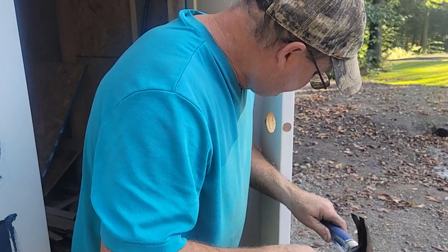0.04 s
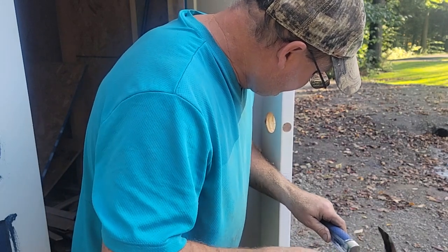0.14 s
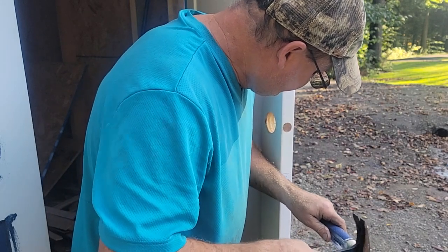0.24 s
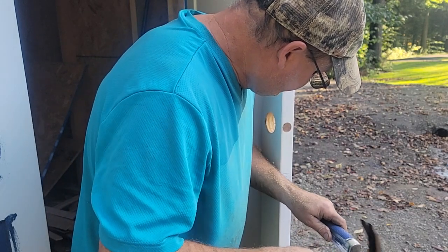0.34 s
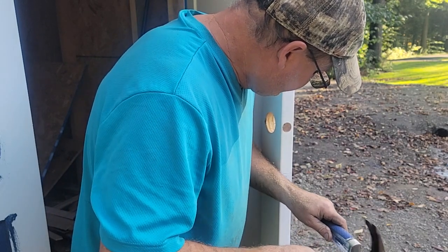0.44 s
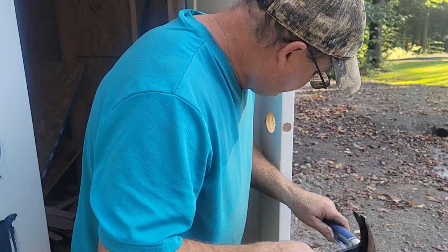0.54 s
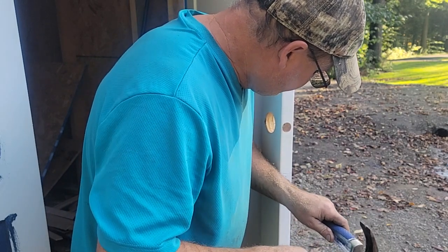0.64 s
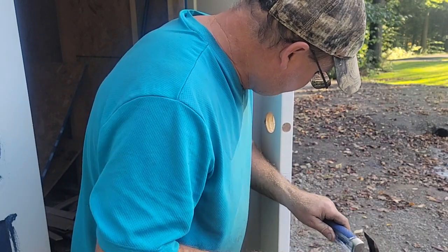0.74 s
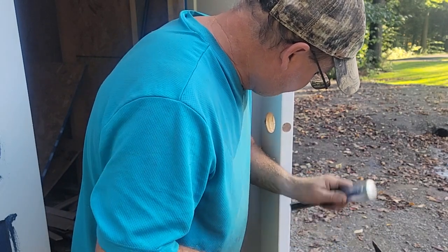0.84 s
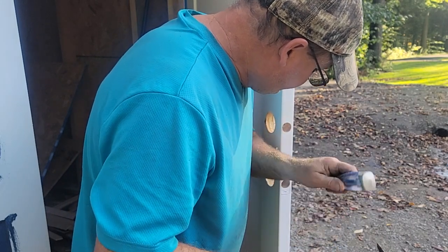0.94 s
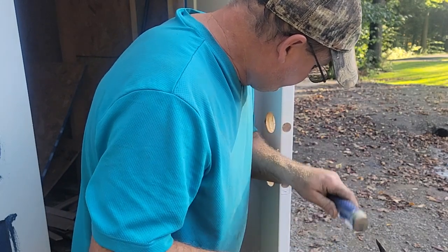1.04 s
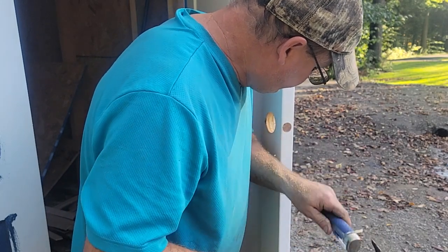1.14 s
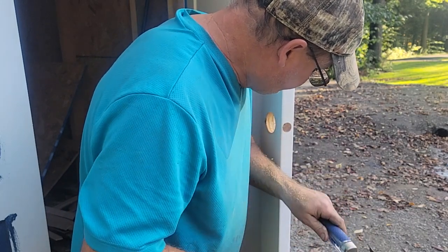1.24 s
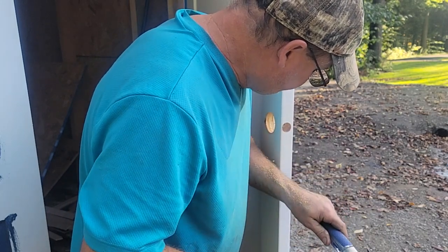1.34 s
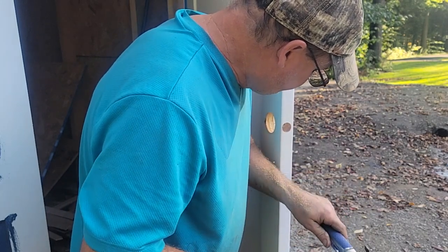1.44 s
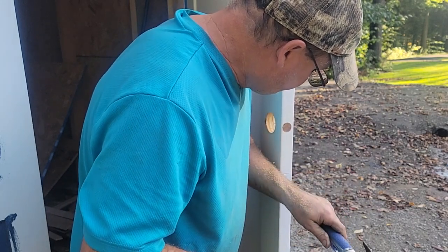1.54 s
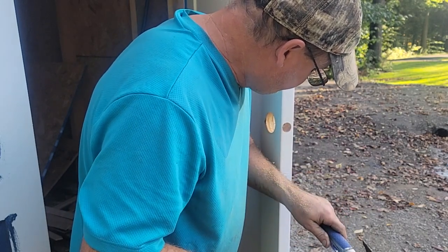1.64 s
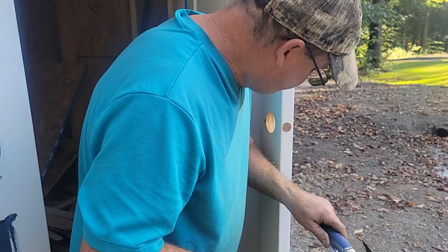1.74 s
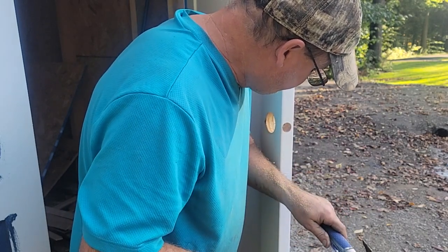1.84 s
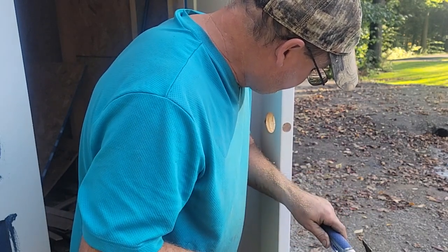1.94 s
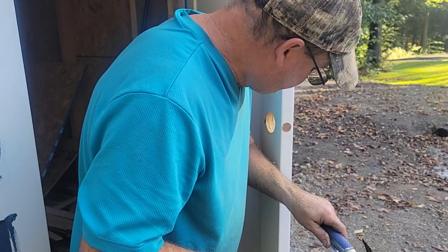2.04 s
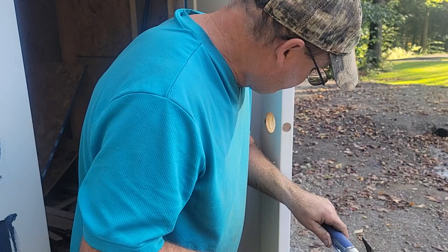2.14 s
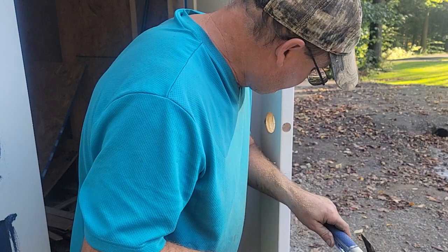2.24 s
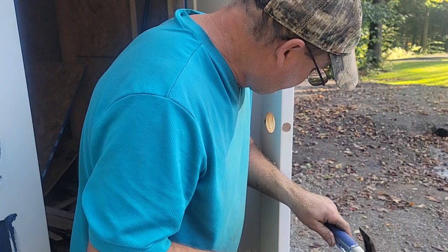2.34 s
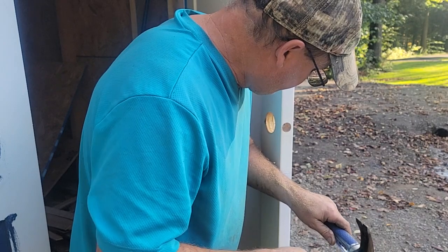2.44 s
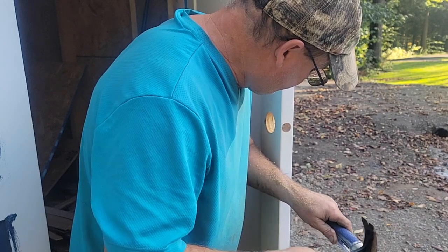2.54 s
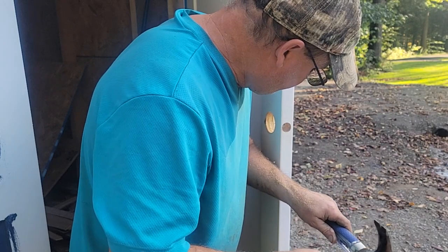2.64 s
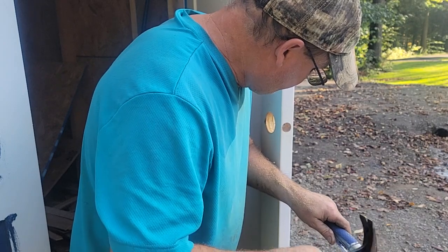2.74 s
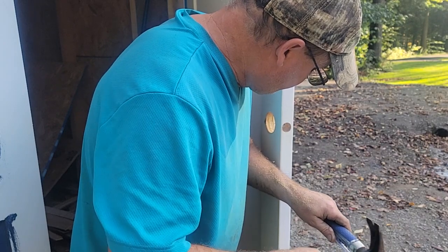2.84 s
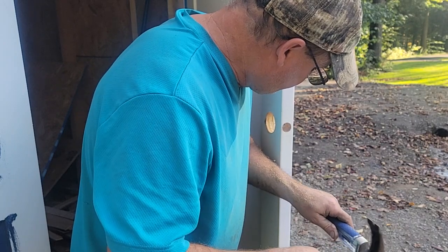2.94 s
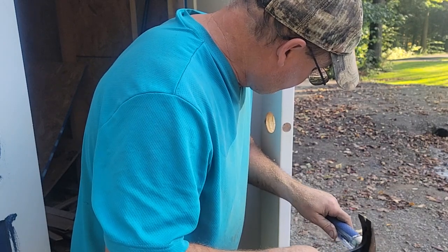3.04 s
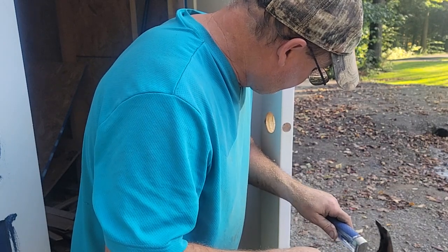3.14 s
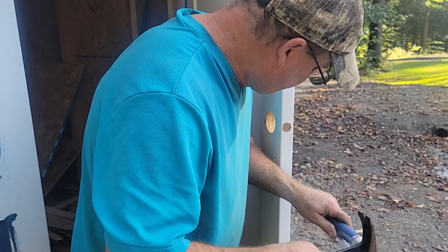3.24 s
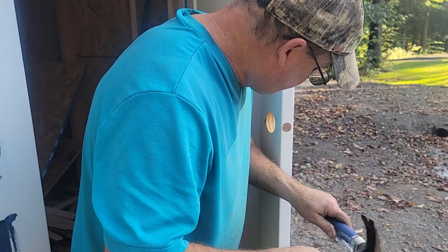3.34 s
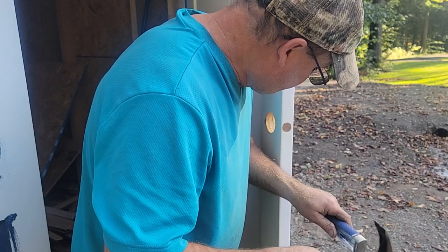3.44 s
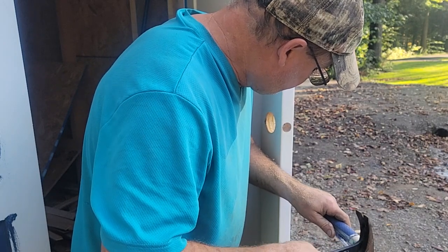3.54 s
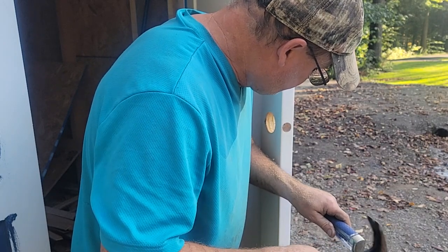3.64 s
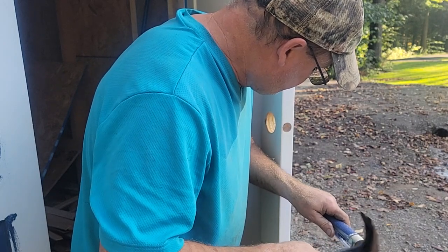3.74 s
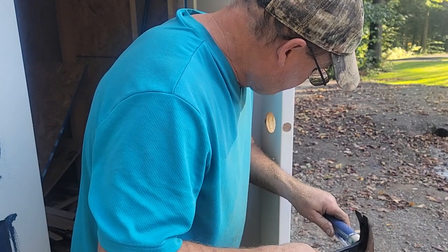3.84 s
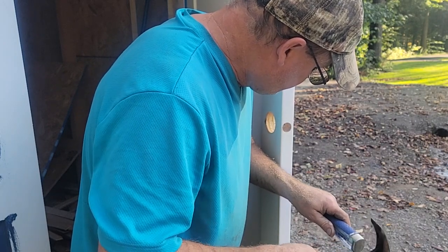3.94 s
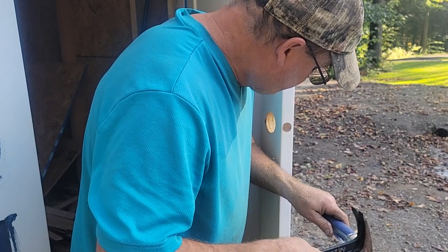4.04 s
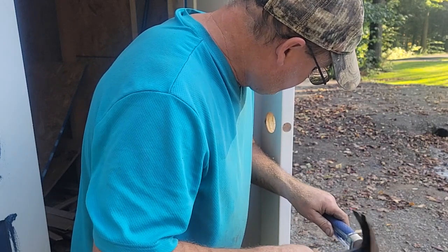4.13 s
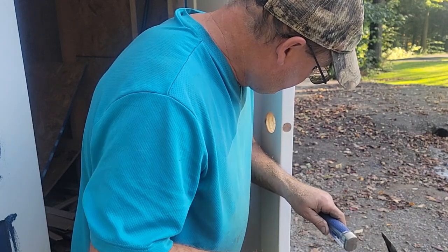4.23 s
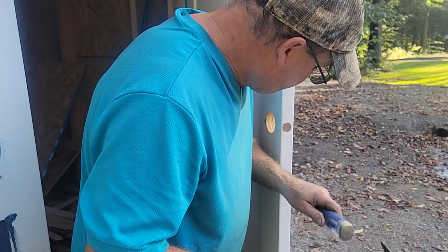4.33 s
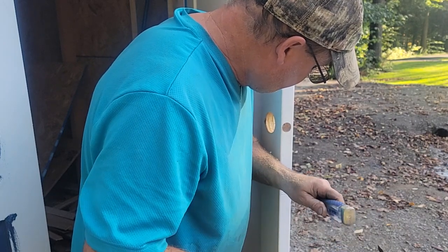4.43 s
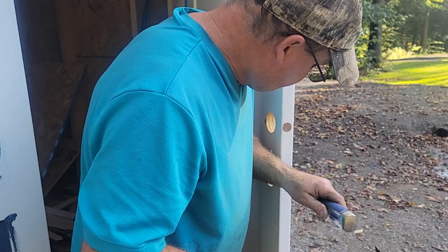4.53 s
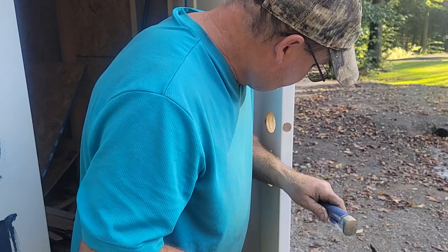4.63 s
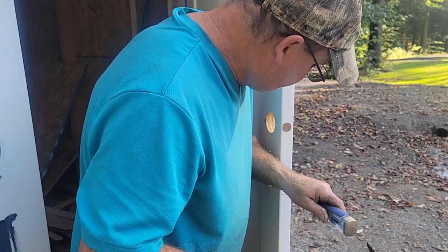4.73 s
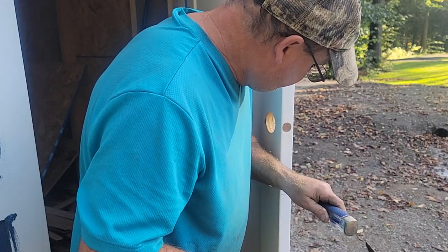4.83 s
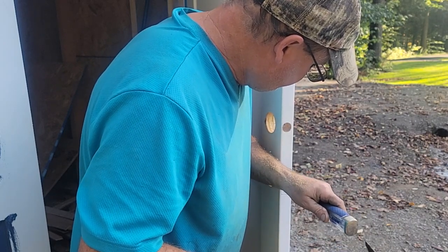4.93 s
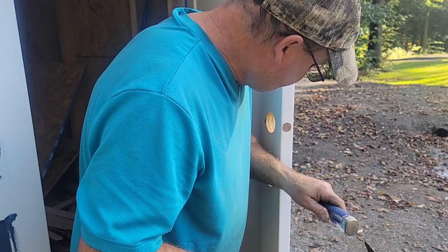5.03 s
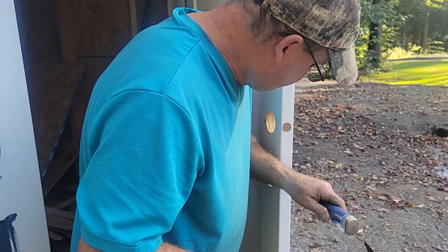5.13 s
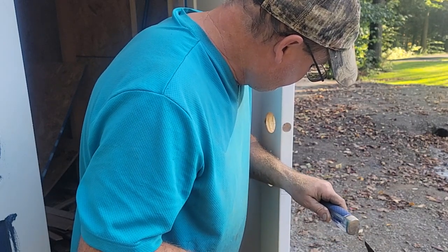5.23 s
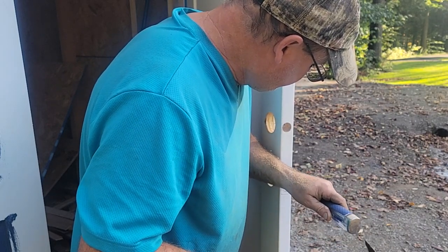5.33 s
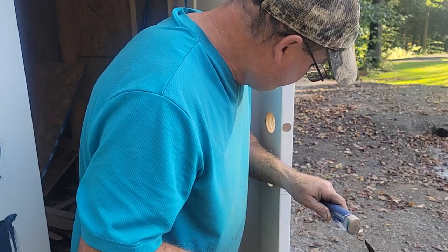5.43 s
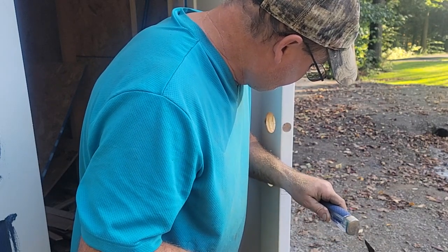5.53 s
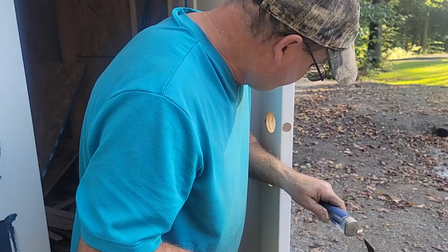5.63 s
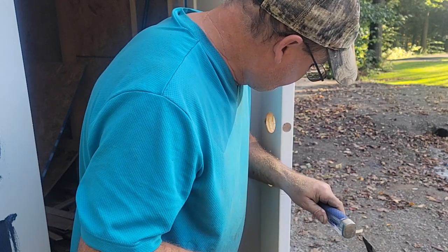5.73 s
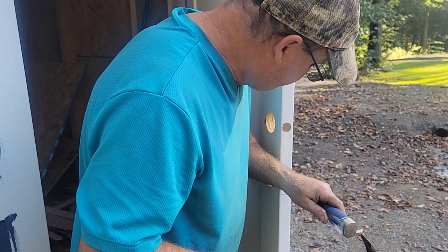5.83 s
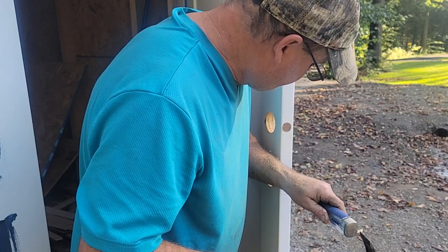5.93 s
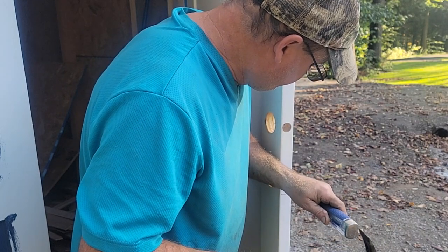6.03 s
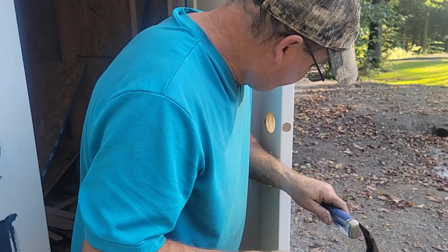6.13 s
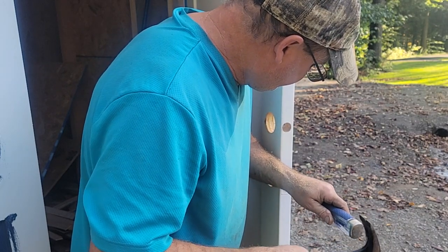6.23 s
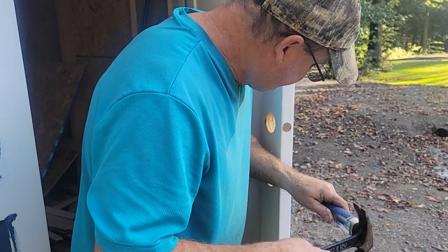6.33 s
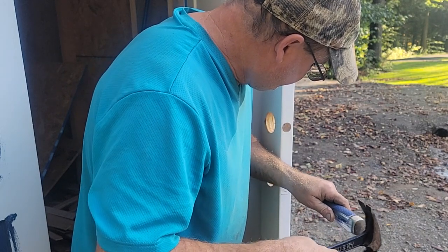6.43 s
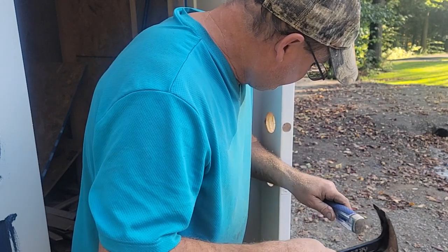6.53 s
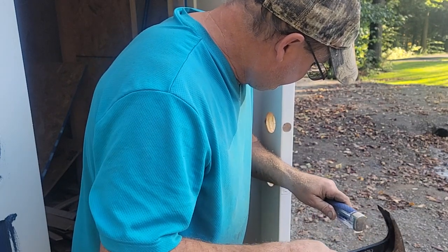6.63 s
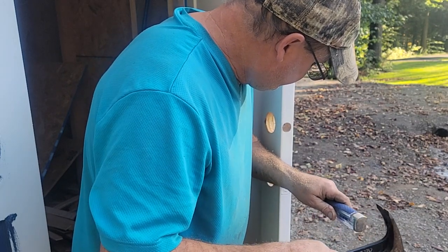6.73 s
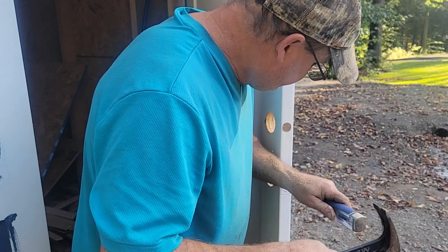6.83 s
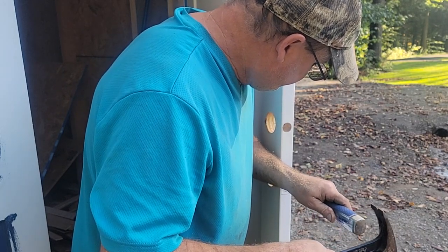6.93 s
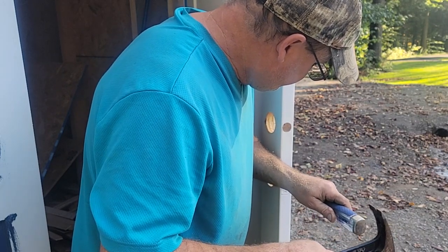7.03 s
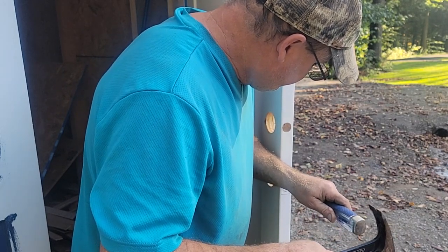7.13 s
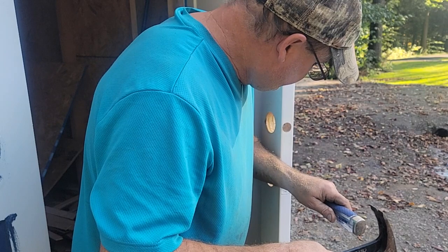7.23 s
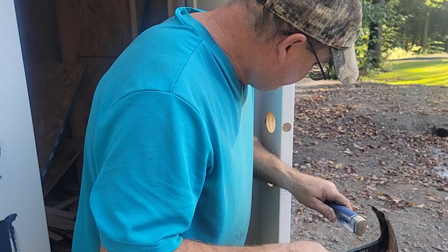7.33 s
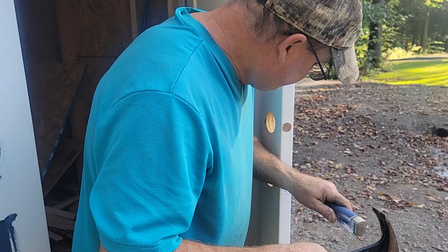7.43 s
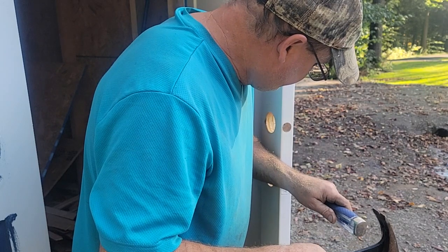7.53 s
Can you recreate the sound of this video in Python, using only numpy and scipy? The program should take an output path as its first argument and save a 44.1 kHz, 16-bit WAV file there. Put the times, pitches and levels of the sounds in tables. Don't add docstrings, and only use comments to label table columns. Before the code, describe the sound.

Outdoors by a wooden shed, steel strikes a chisel set in a door frame: a dying hit and a loud crack, over two seconds of near quiet, seven blows about a quarter second apart growing steelier, another quiet gap with barely audible scrapes, and a final dull tap. Low wall boom and short shed reverberation follow each hit. Distant road drone, airy hiss and faint cricket trill; close stereo microphone.

```python
import sys
import numpy as np
from scipy import signal
from scipy.fft import rfft, irfft, next_fast_len
from scipy.io import wavfile
from scipy.ndimage import uniform_filter1d

SR = 44100
rng = np.random.default_rng(int(sys.argv[2]) if len(sys.argv) > 2 else 0)


def volts_from_db(level):
    exponent = np.asarray(level, float) / 20
    return 10 ** exponent


def pcm_store(signal):
    levels = np.round(np.clip(np.atleast_2d(signal), -1, 1) * 32767)
    wavfile.write(sys.argv[1], SR, levels.astype(np.int16).T)


N = 333837
PADDED = next_fast_len(N + 4096)
LEAD = 256

# pitch_hz, correlation (0 to 1)
LIKENESS = [(60, 0.97), (130, 0.77), (290, 0.41), (640, 0.83), (1400, 0)]


def colour(x, table, column=1):
    size = x.shape[-1]
    hz = np.maximum(np.fft.rfftfreq(size, 1 / SR), 1)
    return irfft(rfft(x) * volts_from_db(lookup(table, hz, column)), size)


def band(x, hz, octaves):
    size = x.shape[-1]
    octaves_off = np.log2(np.maximum(np.fft.rfftfreq(size, 1 / SR), 1) / hz)
    return irfft(rfft(x) * np.cos(np.pi / 2 * np.clip(octaves_off / octaves, -1, 1)), size)


def lookup(table, hz, column=1):
    rows = np.array(table, float)
    return np.interp(np.log(hz), np.log(rows[:, 0]), rows[:, column])


def unit(x):
    return x / np.sqrt(np.mean(x ** 2))


def walk(rate):
    hold = int(SR / rate)
    steps = np.repeat(rng.standard_normal(PADDED // hold + 1), hold)
    return uniform_filter1d(uniform_filter1d(steps, hold), hold)[:PADDED]


def ring(t, hz, t60, gain):
    t = np.maximum(t, 0)[:, None]
    return (np.sin(2 * np.pi * hz * t) * volts_from_db(-60 * t / t60)) @ gain


def add(track, sound, at_s):
    start = int(at_s * SR)
    skip = max(-start, 0)
    stop = min(start + sound.shape[-1], track.shape[-1])
    if stop > 0:
        track[..., start + skip:stop] += sound[..., skip:stop - start]


def pair(like, size):
    mid, side = rng.standard_normal((2, size))
    like = np.clip(like, 0, 1)
    opposed = side * np.array([[1], [-1]])
    return (np.sqrt(1 + like) * mid + np.sqrt(1 - like) * opposed) / np.sqrt(2)


def strike(t, weight_db, wood_db, steel_db):
    # pitch_hz, level_db, t60_s
    tool = [(1120, -15.5, 0.054), (1440, -12, 0.13), (1660, -17.5, 0.028), (2970, -19.5, 0.1),
            (3337, -12, 0.17), (3600, -20.5, 0.046), (4640, -18.5, .14), (5100, -11.5, .1),
            (6250, -16, 0.2), (7000, -10.5, .08), (11100, -11.5, .05), (12990, -14.5, .08),
            (13310, -15.5, .07)]
    # pitch_hz, level_db
    crack_tone = [(150, -29), (400, -12.5), (560, -14), (800, -9), (1200, -5.5), (1900, -2.5), (2700, -8.5),
                  (3300, 0), (5500, -1), (8000, 6), (10000, 2), (13000, 6.5), (15500, 0), (16500, -9)]
    fibres = volts_from_db(-8) * np.exp(-t / .0012) + volts_from_db(-24) * np.exp(-t / .005)
    crack = rng.standard_normal(len(t)) * fibres * np.clip(t / .0005, 0, 1)
    click = .7 * (np.arange(len(t)) == 24)
    spectrum = rfft(crack + click)
    crack = irfft(spectrum / np.sqrt(uniform_filter1d(np.abs(spectrum) ** 2, size=80)), len(t))

    hz, db, t60 = np.transpose(tool)
    chance = rng.standard_normal((2, len(hz)))
    modes = ring(t, hz * (1 + 0.0093 * chance[0]), t60, volts_from_db(db + 2 * chance[1] - 46))

    bite_db = .45 * steel_db - 0.3 * (wood_db + 3.5)
    frame_edge_db = wood_db + 2.66
    blade_db = 0.3 + .2 * weight_db
    shank_db = -0.6 + bite_db / 2
    blend = [(600, wood_db + 0.57), (1000, wood_db), (1400, wood_db), (2200, frame_edge_db),
             (3300, blade_db), (4500, 0), (6000, shank_db),
             (7000, bite_db), (8500, bite_db), (10500, steel_db)]
    sound = colour(np.roll(colour(crack, crack_tone) + modes, LEAD), blend)
    fade_in = np.clip(t * SR / LEAD, 0, 1) ** 2
    fade_out = np.clip(4 - 4 * t / t[-1], 0, 1) ** 2
    return sound * fade_in * fade_out


def lead_in_hiss(hit, t):
    hiss = signal.fftconvolve(rng.standard_normal((2, len(t))), hit[None, :512], axes=1, mode="same")
    ahead = t - t[-1]
    swell = np.exp(ahead / 0.0095) + volts_from_db(11) * np.exp(ahead / 0.001)
    return volts_from_db(-38.5 - 29.5) * hiss * swell


def facing(x):
    # pitch_hz, width_hz, boost_db
    boosts = [(4990, 270, 9), (12725, 670, 7)]
    hz = np.fft.rfftfreq(len(x), 1 / SR)
    boost_db = sum(db * np.exp(-((hz - f) / w) ** 2) for f, w, db in boosts)
    return irfft(rfft(x) * volts_from_db(boost_db), len(x))


def shed(t):
    # pitch_hz, t60_s, level_db
    early_table = [(300, 0.28, -1.5), (1220, .1, 0), (2200, 0.066, -1.5), (3394, .09, -2.5),
                   (4883, 0.046, -0.5), (7000, 0.012, -6), (9000, 0.035, -2), (13000, 0.065, 0)]
    # pitch_hz, t60_s
    tail_t60 = [(200, 0.88), (700, 0.53), (1500, 0.42), (2400, 0.4), (3400, 0.38), (5000, 0.44),
                (7000, 0.25), (9000, 0.26), (13000, 0.43)]
    # pitch_hz, level_db
    tail_tone = [(200, 1.5), (400, 6), (900, 11.5), (2000, 1), (2600, -6), (3300, 0), (4500, -5.5),
                 (6000, -8.5), (9000, -1.5), (13000, -5.5)]
    # pitch_hz, level_db
    yard = [(1000, -16), (2000, -9), (3400, 4), (4300, -3), (7000, -16), (12000, -24)]
    out = 0
    for hz in 200 * 2 ** (np.arange(14) / 2):
        noise = band(pair(lookup(LIKENESS, hz / 3.1), len(t)), hz, 1 / 2)
        early = volts_from_db(-3.5 + lookup(early_table, hz, column=2) - 60 * t / lookup(early_table, hz))
        late = volts_from_db(-24.5 + lookup(tail_tone, hz) - 60 * t / lookup(tail_t60, hz))
        haze = volts_from_db(-37.5 + lookup(yard, hz) - 60 * t / 0.93)
        trees = volts_from_db(-50.5) * np.exp(-((t - .246) / .003) ** 2)
        out = out + noise * (early + late + haze + trees)
    return volts_from_db(-18) * out * np.clip(t / 0.0055, 0, 1)


def hammer():
    # start_s, peak_db, weight_db (push into the wall), wood_db (1-2 kHz), steel_db (11-15 kHz)
    blows = [
        (-0.087, -2, 1.5, -5, -13),
        (0.1769, -3.5, 1, -5, -11.5),
        (2.4274, -16, -3.5, -2, -18),
        (2.6961, -6, -7, -2, -15),
        (2.9333, -11.5, 3.5, -5, -7),
        (3.1974, -10.5, 4.5, -3.5, -6.5),
        (3.4566, -11.5, 7, -3, -4),
        (3.723, -7, 3, -4, -11),
        (3.9697, -8.5, 6.5, -4.5, -7),
        (6.2907, -13, 1.5, 1, -10),
    ]
    # pitch_hz, level_db, t60_s, sign (which way the wall moves at the frame)
    wall = [(34.3, -11, 0.63, 1), (40.9, -8, 0.39, -1), (56.2, -9, 0.1, 1), (73.8, -20, 0.8, -1),
            (95.8, -12, 0.48, -1), (104.0, -9, 0.37, 1), (116.7, -16, 0.8, 1), (125.9, 0, 0.17, -1),
            (143.1, -2, 0.33, -1), (151.3, -3, 0.15, 1), (181.4, -12, 0.34, -1), (205.9, -2, 0.17, 1),
            (220.6, -6, 0.22, -1), (235.9, -8, 0.35, 1), (254.6, -3, 0.1, 1), (265.3, -10, 0.42, -1),
            (292.0, -15, 0.59, -1), (326.8, -8, 0.1, 1)]
    # pitch_hz, level_db
    creak = [(25, -2.5), (45, 7.5), (70, -1), (100, 2), (180, -2), (300, -5.5), (420, -19), (600, -38)]
    t = np.arange(32768) / SR
    hz, db, t60, sign = np.transpose(wall)
    boards = unit(colour(pair(0.94, len(t)), creak)) * volts_from_db(-4 - 60 * t / 0.68) * np.clip(t / .07, 0, 1)
    wall_t = t - .0095
    out = np.zeros((2, N))
    for s, peak_db, boom_db, wood_db, steel_db in blows:
        hit = volts_from_db(peak_db + 26) * strike(t[:8192], boom_db, wood_db, steel_db)
        start = s - (LEAD - 42) / SR
        shade = [(600, 0.5), (1200, -2.5), (2500, 0), (4500, -4), (8000, -0.5), (13000, -1)]
        direct = np.array([np.roll(colour(hit, shade), 4), facing(hit)])
        add(out, direct, start)
        add(out, volts_from_db(-10) * np.array([hit, hit]), start + .0047)
        shed_db = -1.88 + 0.47 * boom_db
        add(out, volts_from_db(shed_db) * signal.fftconvolve(hit[None], shed(t), axes=1), start)
        add(out, lead_in_hiss(hit[LEAD - 64:], t[:1024]) * volts_from_db(20), s - 1024 / SR)
        boom = ring(wall_t, hz, t60, sign * volts_from_db(db + rng.standard_normal(len(hz))))
        wide_gain = volts_from_db(db - 16) * rng.standard_normal(len(hz)) * (hz > 110)
        wide = ring(wall_t, hz, t60, wide_gain) * np.array([[1], [-1]])
        add(out, volts_from_db(peak_db + boom_db - 23) * (boom + boards + wide), s)
    return out


def outdoors():
    # start_s, drone_hz, drone_db
    road = [(0, 103.4, -63), (0.601, 103, -61), (1.202, 101, -65.5), (1.7, 101, -63.5), (2.2, 103, -60),
            (4.4, 97, -64.5), (4.951, 91.7, -75), (5.302, 88.3, -63.5), (5.8, 86.6, -72.5),
            (6.199, 95, -72), (7.0, 86.1, -66.5), (7.57, 98.05, -61)]
    # pitch_hz, level_db (per Hz)
    air_tone = [(25, -9), (50, 7), (120, -2.5), (160, -7), (500, -14), (900, -12), (1400, -18), (2100, -26),
                (4500, -19.5), (7000, -28), (8400, -34.5), (9800, -32.5), (11500, -28.5), (14000, -28.5)]
    s, *columns = np.transpose(road)
    t = np.arange(PADDED) / SR
    drone_hz, drone_db = (np.interp(t, s, c) for c in columns)
    swell_db = -7 + 1.13 * t
    rumble_db = -0.93 + drone_db + 66.5
    air = 0
    for hz in 25 * 2 ** (np.arange(20) / 2):
        tyres = 1 / (1 + (hz / 2000) ** 2)
        deep = 1 / (1 + (hz / 70) ** 4)
        noise = band(pair(lookup(LIKENESS, hz), PADDED), hz, 1 / 2)
        air = air + noise * volts_from_db(tyres * (swell_db + 0.98 * walk(3)) + deep * (rumble_db - swell_db))
    air = unit(colour(air, air_tone)) * volts_from_db(-59)

    engine = np.sin(2 * np.pi * np.cumsum(drone_hz + 5 * walk(25)) / SR)
    drone = engine * volts_from_db(drone_db + 2.5 + 5 * walk(18))

    trill = 1 + 0.35 * np.sin(2 * np.pi * 64 * t + 3 * walk(1.5))
    cricket_db = -79 + 0.41 * t + np.array([[3], [-3]]) + 1.5 * walk(1.4)
    chirps = unit(band(pair(0, PADDED), 4900, 600 / 4900))
    crickets = chirps * trill * volts_from_db(cricket_db)
    return (air + drone + crickets)[:, :N]


def rings():
    # start_s (of the blow), pitch_hz, level_db (at the start), t60_s
    singing = [(.178, 560, -40, .15), (.178, 1600, -37, .2), (.178, 3220, -34, .2), (.178, 3650, -37, .3),
               (2.428, 4950, -41, .08), (2.697, 1700, -33, .08), (2.697, 1950, -37, .06),
               (2.697, 6200, -35, .06), (2.935, 4430, -34, .24), (2.935, 6020, -38.5, .24),
               (2.935, 7150, -33, .1), (3.199, 1120, -37, .09), (3.199, 3300, -35, .2),
               (3.199, 7100, -36, .1), (3.457, 3290, -32, .22), (3.457, 3600, -36, .22),
               (3.724, 1120, -36, .1), (3.724, 1450, -33, .1), (3.724, 4970, -33, .1),
               (3.971, 1450, -35, .1), (3.971, 3300, -36, .3), (6.292, 1660, -37, .22),
               (6.292, 2530, -37, .14), (6.292, 3300, -42, .2), (6.292, 4350, -44, .16)]
    t = np.arange(16384) / SR
    out = np.zeros((2, N))
    for s, hz, db, t60 in singing:
        spread = 1 + .008 * rng.standard_normal((2, 4))
        gain = volts_from_db(db - 2.5) * np.ones(4)
        add(out, np.array([ring(t, hz * port, t60, gain) for port in spread]), s + .001)
    return out + volts_from_db(-7.5) * signal.fftconvolve(out, shed(t), axes=1)[:, :N]


def ticks():
    # start_s, peak_db, pan_db (left minus right), length_s
    touches = [
        (.771, -50.5, -2, 0.0066),
        (1.40, -67, -12.5, 0.0089),
        (4.588, -72, -8.5, .008),
        (5.34, -76, 4, .01),
    ]
    t = np.arange(4096) / SR
    blade_gain = volts_from_db(np.array([-2.0, 6, -8, 3, 3]) - 27)
    blade = ring(t, np.array([2180, 3050, 4430, 6200, 12500]), 0.026, blade_gain)
    out = np.zeros((2, N))
    for s, peak_db, pan_db, length in touches:
        scrape = rng.standard_normal((2, len(t))) * np.sqrt(t / length) * np.exp(-t / length)
        rasp = colour(scrape, [(800, -12), (1600, 3), (6000, 6), (13000, 2)])
        touch = rasp + signal.fftconvolve(scrape[:1], blade[None], axes=1)[:, :len(t)]
        add(out, volts_from_db(peak_db + np.array([[pan_db], [-pan_db]]) / 2) * touch, s - .002)
    return out


def scene():
    return hammer() + rings() + ticks() + outdoors()


def band_limit(x):
    return signal.sosfilt(signal.butter(12, 16960, fs=SR, output="sos"), x)


def record(dry):
    # pitch_hz, left_db, right_db
    port_tone = [(60, 0, 1), (2320, 0, 1.5), (3260, -1.5, 0), (4000, -5, -1.5), (4620, -2.5, 1),
                 (4720, -1, -1), (6380, 3.5, -12), (7140, 4, -8.5), (7620, -2, -18.5), (7950, -12.5, -37.5),
                 (9860, -3.5, -20.5), (9900, -4.5, -3), (10760, -5, -10), (12200, -4.5, -0.5),
                 (13700, -5.5, -5)]
    dry = np.pad(dry, ((0, 0), (0, PADDED - N)))
    left = colour(dry[0], port_tone, column=1)
    right = colour(dry[1], port_tone, column=2)
    ports = np.array([left, right])[:, :N]
    headroom = .84
    rounded = headroom * np.tanh(ports / headroom)
    top_cut = signal.ellip(8, .2, 60, 16000, fs=SR, output="sos")
    mix = signal.sosfilt(top_cut, rounded)
    return band_limit(mix)


dry = scene()
out = record(dry)
pcm_store(out)
```